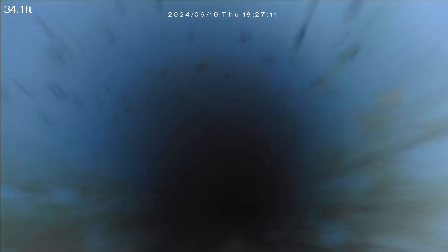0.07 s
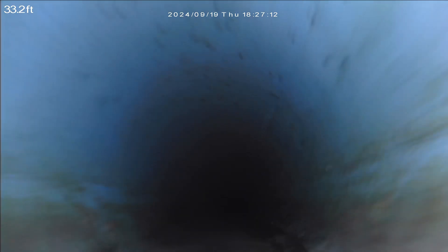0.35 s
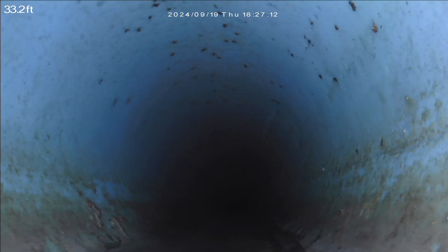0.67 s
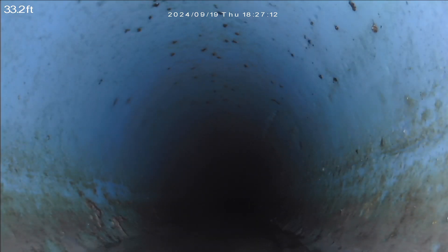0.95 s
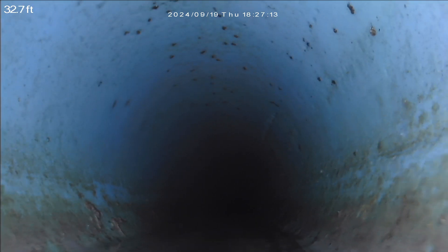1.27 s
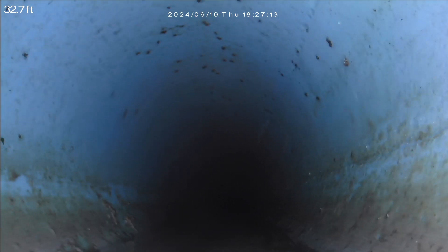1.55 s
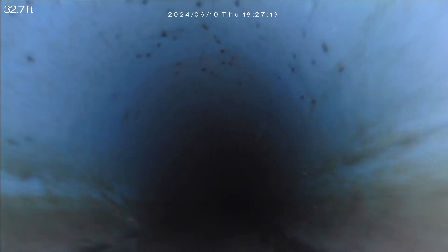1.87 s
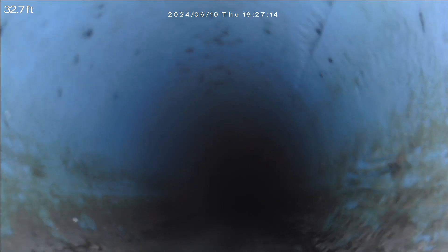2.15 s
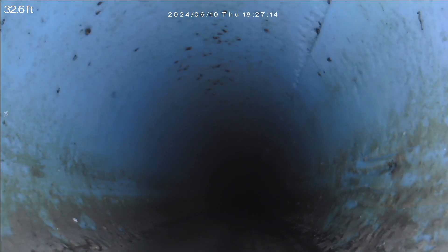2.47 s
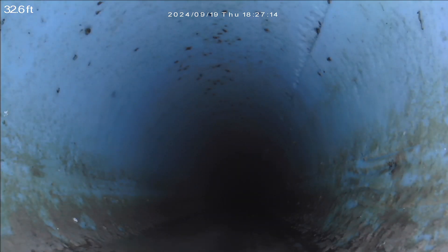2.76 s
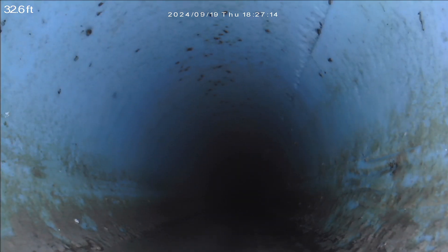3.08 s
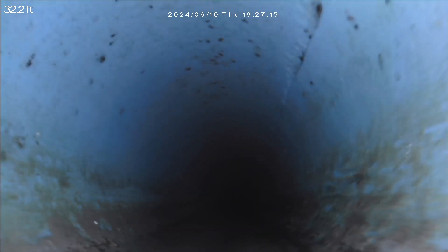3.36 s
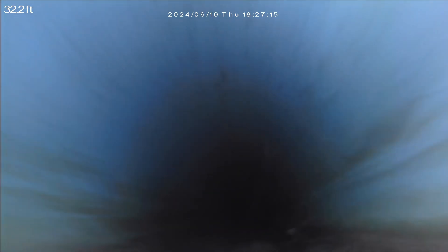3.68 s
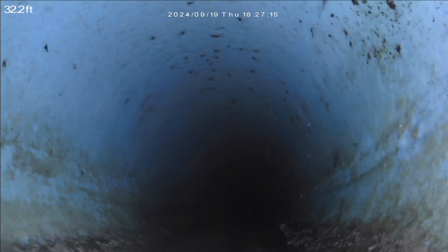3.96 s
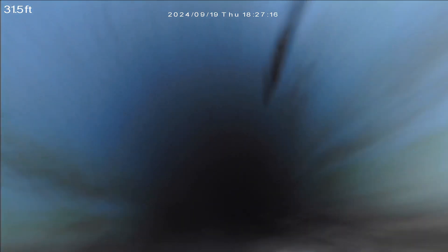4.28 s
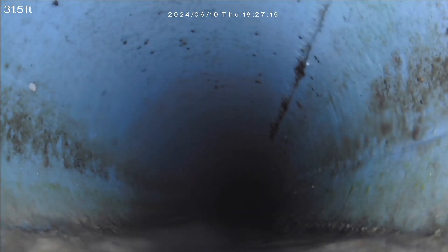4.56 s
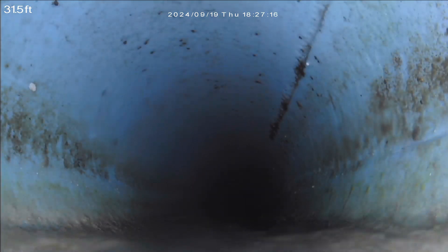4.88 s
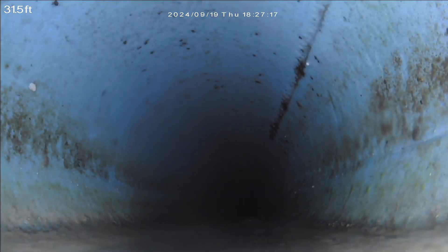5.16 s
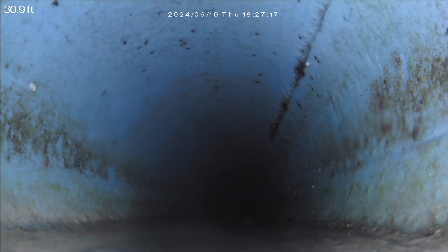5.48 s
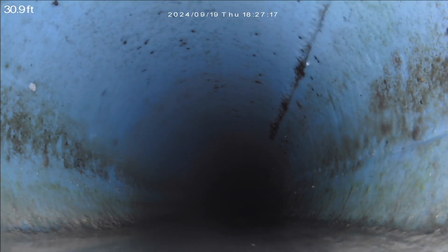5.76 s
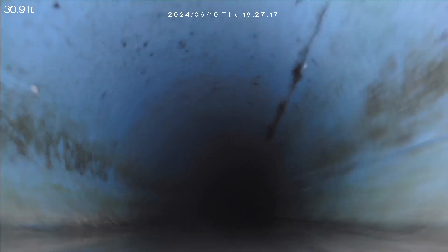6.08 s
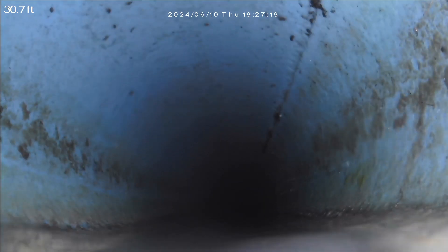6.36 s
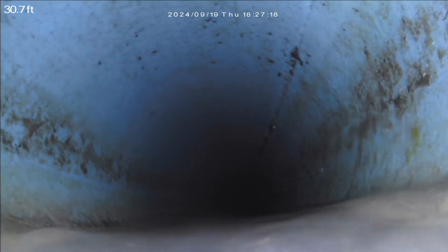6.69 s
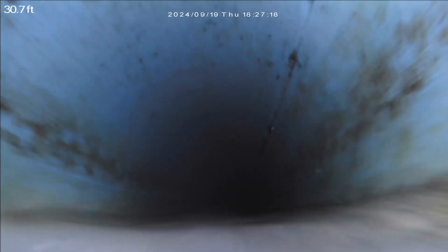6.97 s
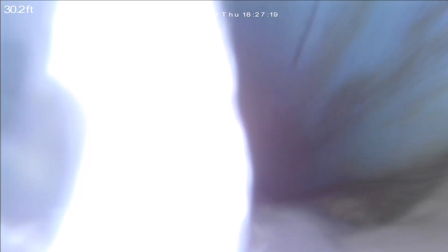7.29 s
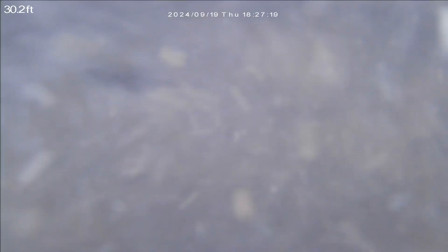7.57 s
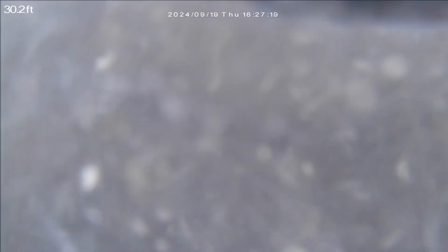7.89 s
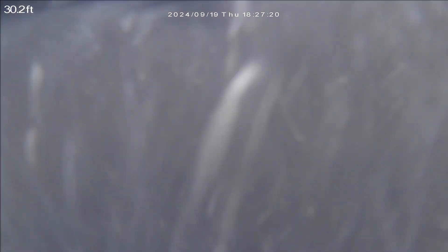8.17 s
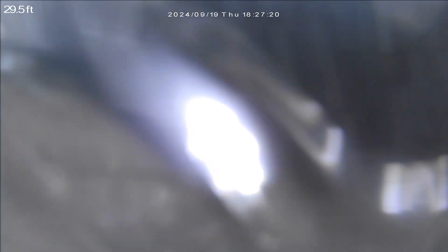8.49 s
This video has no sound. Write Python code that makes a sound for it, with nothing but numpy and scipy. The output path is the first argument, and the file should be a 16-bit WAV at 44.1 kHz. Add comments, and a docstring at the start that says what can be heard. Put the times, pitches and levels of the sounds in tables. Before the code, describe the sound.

A stiff cable is hauled back through a drain pipe in strokes, rumbling and scraping, with knocks on its reel frame and brief squeals.

```python
"""Rumbling scrapes and knocks come in strokes: a drain camera is hauled back, and its stiff push cable
rubs through the guide, strikes the reel frame, twangs and squeals. The microphone sits in the control
box on that frame, so rumble, scraping and blows share the same resonances, and hard pulls overload it.
In the pauses a low hum, hiss and faint rustling remain; near the end the sound cuts out for a moment."""
import sys
import numpy as np
from scipy import signal
from scipy.fft import rfft, irfft
from scipy.io import wavfile
from scipy.ndimage import uniform_filter1d

SR = 44100
rng = np.random.default_rng(int(sys.argv[2]) if len(sys.argv) > 2 else 0)


def store_pcm(level_fs):
    """Save levels as 16-bit WAV."""
    pcm = np.round(np.clip(level_fs, -1, 1) * 32767).astype(np.int16)
    wavfile.write(sys.argv[1], SR, np.atleast_2d(pcm).T)


N = 376602
TIME = np.arange(N) / SR
EVENT_SAMPLES = 16384


def undb(db):
    """Amplitude ratio of a level in decibels."""
    return 10 ** (np.asarray(db) / 20)


def unit(x):
    """Normalise to rms 1."""
    return x / np.sqrt(np.mean(x ** 2))


def crest(x, span_s):
    """Normalise the loudest stretch of span_s to rms 1."""
    return x / np.sqrt(uniform_filter1d(x ** 2, int(span_s * SR)).max())


def steady(x, span_s):
    """Division by the running rms removes slow swells and leaves the fast grain."""
    return x / np.sqrt(uniform_filter1d(x ** 2, int(span_s * SR)) + 1e-12)


def walk(per_s):
    """Slow random modulation of rms 1: held values, smoothed twice."""
    hold = int(SR / per_s)
    held = rng.standard_normal(4096)[np.arange(N) // hold % 4096]
    return unit(uniform_filter1d(uniform_filter1d(held, hold), hold))


def band(x, lo_hz, hi_hz, order=3):
    """Band-pass filter."""
    return signal.sosfilt(signal.butter(order, [lo_hz, hi_hz], "band", fs=SR, output="sos"), x)


def response(points, modes=(), size=8192):
    """Minimum-phase impulse response of a smooth spectrum with resonance peaks on top."""
    hz = np.maximum(np.fft.rfftfreq(size, 1 / SR), 1)
    points_hz, points_db = np.transpose(points)
    db = np.interp(np.log(hz), np.log(points_hz), points_db)
    for centre, width, lift in modes:
        db = db + lift / (1 + (2 * (hz - centre) / width) ** 2)
    cepstrum = irfft(np.log(undb(db)))
    cepstrum[1:size // 2] *= 2  # folding onto positive time makes the response causal
    cepstrum[size // 2 + 1:] = 0
    return irfft(np.exp(rfft(cepstrum)))


def ring(force, impulse):
    """A linear resonator convolves the force with its impulse response."""
    return signal.fftconvolve(force, impulse)[:len(force)]


def add(out, start_s, x):
    """Superpose a sound from start_s on."""
    i = int(start_s * SR)
    out[i:i + len(x)] += x[:N - i]


def slips(per_s, spread_db, smooth):
    """Stick-slip friction: random jerks of uneven size over smooth sliding noise."""
    jerks = (rng.random(N) < per_s / SR) * np.sign(rng.standard_normal(N))
    sizes = undb(spread_db * np.minimum(rng.exponential(size=N), np.pi))
    return unit(jerks * sizes) + smooth * rng.standard_normal(N)


def bend(x, travel_s):
    """Dispersion in a stiff rod: high frequencies arrive first; travel_s is the group delay at 200 Hz."""
    hz = np.fft.rfftfreq(len(x), 1 / SR)
    return irfft(rfft(x) * np.exp(-4j * np.pi * travel_s * np.sqrt(200 * hz)))


def contact(noise, chatter_s, chatter):
    """Impact force: an impulse, then exponentially decaying chatter."""
    force = chatter * noise * np.exp(-np.arange(len(noise)) / SR / chatter_s)
    force[0] += 1
    return force


def background():
    """Broadband air noise coloured by resonances, and a low hum modulated in pitch and level."""
    # Each row: frequency in Hz, spectral density of the air noise in dB.
    air_spectrum = [(25, -34.5), (60, -17), (95, -14), (170, -26), (270, -9), (500, -5), (830, -15),
                    (1020, -22.5), (1500, -29.5), (1900, -29.5), (2250, -31), (3200, -34.5), (4100, -31),
                    (6000, -39), (9000, -39), (13000, -46.5)]
    # Each row: resonance frequency in Hz, width in Hz, lift in dB.
    air_modes = [(261, 18, 6.5), (510, 22, 3.5), (745, 29, 8.5), (858, 79, 5.5), (1160, 93, 6),
                 (1690, 73, 12.5), (1884, 90, 11.5), (1985, 60, 10)]
    air = unit(ring(rng.standard_normal(N), response(air_spectrum, air_modes)))
    air *= undb(-45 + 0.43 * walk(6.4))
    hum_hz = 60 * (1 + .05 * walk(12))
    hum = np.sqrt(2) * np.sin(2 * np.pi * np.cumsum(hum_hz) / SR)
    return air + hum * undb(-54 + 1.8 * walk(4))


def rustle(decay_s=.012, level_db=-66.5):
    """Sparse slips of the slack cable each release a faint, decaying burst of noise."""
    grain = rng.standard_normal(4096) * np.exp(-np.arange(4096) / SR / decay_s)
    scuffs = ring(slips(per_s=20, spread_db=1, smooth=0), grain)
    return unit(band(scuffs, 3000, 8000, order=2)) * undb(level_db)


def swishes():
    """Light sliding friction hisses in soft swells without exciting the frame."""
    # Each row: centre in seconds, half-length in seconds, level in dB.
    swells = [(3.14, .12, -58.5), (3.836, 0.11, -57), (4.41, 0.12, -62), (4.793, 0.1, -56.5),
              (5.162, 0.037, -57.5), (5.306, 0.043, -53.5), (5.575, 0.063, -58), (5.794, 0.03, -58),
              (5.972, 0.045, -62), (6.23, 0.025, -50), (7.68, 0.14, -57)]
    envelope = sum(undb(db) * np.exp(-2 * ((TIME - s) / half_s) ** 2) for s, half_s, db in swells)
    hiss = unit(band(slips(per_s=350, spread_db=4, smooth=.4), 3300, 9500, order=2))
    return hiss * envelope * undb(3.5 * walk(45))


def slide(start_s=8.147, end_s=8.27, level_db=-47):
    """Friction noise: a thin hiss as the cable starts to slide again."""
    # Each row: frequency in Hz, level of the hiss in dB.
    hiss_spectrum = [(2500, -22), (3700, -9), (4250, -4), (4700, -8), (7400, -8), (8000, 0), (8650, -1),
                     (9400, -9), (11500, -28)]
    sliding = uniform_filter1d(1. * ((TIME > start_s) & (TIME < end_s)), size=300)
    return unit(ring(rng.standard_normal(N), response(hiss_spectrum))) * sliding * undb(level_db)


def squeals():
    """Stick-slip friction feeds a single resonance, which swells into a rough tone and dies."""
    # Each row: centre in seconds, half-length in seconds, pitch in Hz, level in dB.
    tones = [(1.25, 0.14, 1880, -32), (1.29, 0.033, 498, -16.5), (2.8, 0.052, 504, -21),
             (3.57, 0.096, 3030, -44), (4.24, 0.037, 2960, -39.5), (6.415, 0.048, 1178, -29),
             (6.855, 0.029, 1180, -33.5), (7.165, 0.042, 2940, -43), (7.225, 0.029, 471, -13.5),
             (7.31, 0.023, 1190, -21.5), (7.42, 0.078, 375, -35), (8.4, 0.031, 489, -9)]
    out = np.zeros(N)
    t = (np.arange(EVENT_SAMPLES) - EVENT_SAMPLES // 2) / SR
    for centre_s, half_s, hz, db in tones:
        tone = band(rng.standard_normal(EVENT_SAMPLES), hz / 1.055, hz * 1.055, order=2)
        envelope = np.exp(-(t / half_s) ** 2)
        add(out, centre_s + t[0], crest(tone * envelope, 0.016) * undb(db))
    return out


def twangs(frame, lead_s=0.00806, echo_s=0.0211, echo_gain=0.56):
    """A flick disperses along the cable into a short falling note, then reflects from the reel."""
    # Each row: time in seconds, level in dB, strongest pitch in Hz.
    flicks = [(2.623, -27, 169), (2.914, -31.5, 177), (3.592, -20, 161), (3.844, -25.5, 179),
              (3.906, -28.5, 200), (4.025, -27.5, 230), (4.103, -25, 250), (4.23, -18.5, 253),
              (4.515, -45, 190), (5.863, -34.5, 272), (6.035, -21.5, 294), (8.261, -10, 267)]
    out = np.zeros(N)
    wave = bend(np.pad(frame, (0, EVENT_SAMPLES - len(frame))), travel_s=.034)
    wave = wave + echo_gain * np.roll(wave, int(echo_s * SR))
    for s, db, hz in flicks:
        note = band(wave, hz / 1.3, hz * 1.4, order=2)
        add(out, s - lead_s, crest(note, 0.062) * undb(db))
    return out


def knocks(frame, rebound_above_db=-9, rebound_s=0.014, rebound_db=-5):
    """Impacts excite free vibration: a falling thud, a clack of the box, a ring of the hoop, a tick."""
    # Each row: start in seconds, strength in dB, hardness in dB (lifts all but the thud),
    # edge in dB (lifts the tick alone).
    blows = [(0.181, -18.5, -11.5, -4), (0.244, -33.5, 1, 12), (0.471, -16, 5, 11), (0.606, -24.5, -6.5, 5),
             (0.648, -18, -14, -5), (0.769, -22, 5, -7), (0.885, -7, 5, 1.5), (0.935, -28.5, 7, -6),
             (1.186, 0, -7.5, 6.5), (1.354, -15, -4, -10), (1.431, -23, -13.5, 2), (1.559, -7, -6.5, 7.5),
             (1.608, -17, -2.5, 5), (1.669, -11, 0.5, 7.5), (1.736, -11, -7.5, 15),
             (1.826, -15, -11.5, 2.5), (1.896, -18, -1, -5.5), (1.974, -15, -12, -2),
             (2.041, -22.5, -4.5, 0.5), (2.125, -23, -3, 9), (2.186, -11.5, -7.5, 4.5),
             (2.31, -15, -11.5, 7), (2.357, -20, 3, -8), (2.471, -33.5, 0, 3), (2.504, -21, -23, 8),
             (2.637, -18.5, -12.5, -12), (2.886, -19.5, -1.5, -8), (3.113, -18.5, -20, 5),
             (3.292, 0, -12, 0), (3.351, -23, 10, -8), (3.596, -14.5, -11, -5), (3.652, -29.5, -1, 10),
             (3.824, -29, -5, -5), (4.157, -14.5, -15, -3), (4.304, -33.5, 1.5, 9), (4.518, -27.5, -11, -5),
             (4.662, -34.5, -4, -7), (5.867, -30, -14.5, -3), (6.024, -27, 0, -12), (6.227, -36, 0.5, 8),
             (6.357, -13.5, -7.5, 0.5), (6.401, -11.5, -9.5, -5), (6.711, -16.5, -5, -9),
             (6.788, -27.5, -3, -8), (6.906, -14.5, -5, -23), (7.033, -16.5, -11.5, -3),
             (7.267, -19, -26, -9), (7.303, -9, -14, -7), (7.347, -12.5, -13.5, -3), (7.406, -7.5, -23, -5),
             (7.497, -34, -6, 5), (8.147, -28, -27, 0), (8.244, -10, -6, 0), (8.268, -10.5, -2.5, 0.5),
             (8.3, -12.5, -13, 4)]
    # Each row: frequency in Hz, broad response of the steel hoop in dB.
    hoop_spectrum = [(1800, -18.5), (2600, -6.5), (3400, 3.5), (5400, -8.5), (6500, -18.5), (9000, -28),
                     (16000, -30.5)]
    # Each row: resonance frequency of the hoop in Hz, width in Hz, lift in dB.
    hoop_modes = [(2360, 98, 17.5), (3020, 260, 18), (4500, 560, 11), (5244, 320, 16.5), (5890, 410, 5.5)]
    # Each row: frequency in Hz, level of a hard contact in dB.
    tick_spectrum = [(2500, -7), (4400, 4.5), (5400, 4), (6500, -3.5), (8000, 1.5), (9500, -3),
                     (11500, -14.5), (16000, -19.5)]
    hoop, hard_contact = response(hoop_spectrum, hoop_modes), response(tick_spectrum)
    out = np.zeros(N)
    for start_s, db, hardness_db, edge_db in blows:
        noise = rng.standard_normal(EVENT_SAMPLES)
        jolt = ring(contact(noise, chatter_s=0.0056, chatter=0.069), frame)
        thud = bend(band(jolt, 255, 1095, order=2), travel_s=0.00627)
        clack = band(ring(contact(noise, chatter_s=.007, chatter=.3), frame), 700, 2500)
        ping = ring(contact(noise, chatter_s=0.005, chatter=0.3), hoop)
        tick = ring(contact(noise, chatter_s=0.0098, chatter=.4), hard_contact)
        clack_db = db + hardness_db
        ping_db = clack_db - 13 + 0.41 * hardness_db  # soft blows hardly ring the hoop
        tick_db = clack_db - 20 + edge_db
        parts = (thud, db), (clack, clack_db), (ping, ping_db), (tick, tick_db)
        blow = sum(crest(part, 0.035) * undb(part_db) for part, part_db in parts)
        add(out, start_s, blow)
        if db > rebound_above_db:  # the heaviest blows bounce once
            add(out, start_s + rebound_s, blow * undb(rebound_db))
    return out


def tug(start_s, length_s, attack_s=0.04, release_db_per_s=207.5):
    """Envelope of a tug: a linear rise, and exponential decay once length_s has passed."""
    t = TIME - start_s
    return np.clip(t / attack_s, 0, 1) * undb(-release_db_per_s * np.clip(t - length_s, 0, 1))


def shares(rub_db, rumble_db, grit_db, bright_db, sway_db):
    """Gains of sway, rumble, low rub, high rub and grit; brightness divides the power of the rub."""
    low = 1 / np.hypot(1, undb(bright_db))
    ratios = undb(rumble_db + sway_db), undb(rumble_db), low, low * undb(bright_db), undb(grit_db)
    return np.array([undb(rub_db) * ratio for ratio in ratios])


def effort():
    """The five friction gains over time: drag and tugs add in power, as incoherent sources do."""
    # Each row: time in seconds, rub in dB, rumble and grit in dB relative to the rub,
    # sway in dB relative to the rumble.
    drag_levels = [(0, -31, 1, -11.5, -7), (0.6, -22.5, 3.5, -18, 2), (1.5, -27, 9.5, -16, -3.5),
                   (2.0, -26.5, 4.5, -14, 5.5), (2.801, -27, 1.5, -19.5, 1), (3.2, -35, 7, -15, 3.5),
                   (3.48, -22.5, -4, -12, -24), (4.0, -36.5, 2.5, -13, 2.5), (4.36, -29.5, -10.5, -16, 4.5),
                   (4.85, -53.5, 3, -19, 4), (5.78, -57.5, 0.5, -3.5, 7), (5.92, -37, -1.5, -24, -6),
                   (6.14, -36, 5, -8.5, -0.5), (6.65, -32.5, -0.5, -16.5, 12), (6.95, -27, 0, -11.5, -11),
                   (7.52, -31, 5, -21, 4.5), (7.9, -52, 13.5, -11, -1), (8.34, -18.5, -3, -29, 0)]
    # Each row: start in seconds, length in seconds, rub in dB, rumble and grit in dB relative
    # to the rub, brightness in dB (high rub over low rub).
    tugs = [(0.058, 0.036, -24.5, 7.5, -31, -2), (0.186, 0.15, -15, 6, -17.5, -4),
            (0.284, 0.19, -2.5, 3.5, -11, -0.5), (0.527, 0.07, -17, 7.5, -36, -18),
            (0.713, 0.061, -21.5, 10.5, -16, 4), (0.862, 0.18, -13.5, 1, -15, 1.5),
            (0.977, .11, -10.5, -2.5, -13.5, -7), (1.166, 0.055, -8, 2.5, -12, 1),
            (1.362, 0.081, -18, -12, -38, -5), (1.629, 0.12, -3.5, 1, -15, -4),
            (1.773, 0.16, -16.5, 5.5, -21.5, -10), (2.1, 0.1, -8, 3, -20.5, -7.5),
            (2.278, 0.032, -14.5, 2.5, -18.5, 1), (2.49, 0.042, -21, 9.5, -41, -28),
            (2.626, 0.03, -19, 9, -23, -7), (2.895, 0.033, -21, 6.5, -15, -5),
            (3.086, 0.036, -18, -10, -21.5, -3), (3.253, 0.12, -15, -2.5, -22, 0.5),
            (3.544, 0.096, -19, 2, -12, -6), (3.838, 0.034, -22.5, -1, -34, -2.5),
            (4.007, 0.09, -27.5, 1, -24, 5), (4.129, 0.16, -20, -10, -13.5, 1.5),
            (4.506, 0.066, -30, -0.5, -33, -10), (4.637, 0.035, -35, -1, -5, 1),
            (6.015, 0.056, -19, -19, -18, -6.5), (6.334, .035, -17, 1, -11.5, 8),
            (6.386, 0.037, -19, -4, -22, -6), (6.544, 0.036, -28.5, 8.5, -11, -9),
            (6.818, 0.042, -19.5, -10, -31, 6), (7.057, 0.15, -21.5, -27, -20, 1),
            (7.258, 0.098, -9, -4.5, -27, -1.5), (7.336, .12, -10.5, -1.5, -24.5, -4),
            (8.243, 0.034, -6.5, -8.5, -14, 2), (8.366, 0.2, -11.5, -2, -20.5, -0.5)]
    times, *columns = np.transpose(drag_levels)
    rub_db, rumble_db, grit_db, sway_db = (np.interp(TIME, times, column) for column in columns)
    drag = shares(rub_db, rumble_db, grit_db, bright_db=-4.5, sway_db=sway_db)
    judder = undb(2.5 * walk(20))  # the drag is never quite even
    tug_gains = np.array([shares(*row[2:], sway_db=-2.5) for row in tugs])
    envelopes = np.array([tug(*row[:2]) for row in tugs])
    return np.sqrt((drag * judder) ** 2 + tug_gains.T ** 2 @ envelopes ** 2)


def hauling(frame, full_grit_db=-12.5):
    """Friction forces the frame to vibrate: the reel rumbles, the cable rubs and grit scrapes."""
    shaking = ring(slips(per_s=300, spread_db=3, smooth=0.48), frame)
    sway = steady(band(shaking, 25, 84.4), span_s=0.13) * undb(-3.0)  # the whole reel moves
    rumble = steady(band(shaking, 82.0, 165.0), span_s=0.076) * undb(-0.5)
    rubbing = ring(slips(per_s=300, spread_db=1.0, smooth=0.51), frame)
    low_rub = steady(band(rubbing, 184.5, 418.5), span_s=0.054)
    high_rub = steady(band(rubbing, 429, 1110), span_s=0.057)  # favoured by quicker sliding
    grinding = ring(slips(per_s=2200, spread_db=2.0, smooth=0.58), frame)
    scrape = unit(band(grinding, 900, 14000)) * undb(1.8 * walk(60))
    cracking = ring(slips(per_s=220, spread_db=2, smooth=0), frame)
    crunch = unit(band(cracking, 1500, 15000)) * undb(-5.5)
    gains = effort()
    load = (gains[-1] / undb(full_grit_db)) ** .3  # coarse grains crack more softly in a lighter pull
    grit = scrape + load * crunch
    return sum(gain * part for gain, part in zip(gains, (sway, rumble, low_rub, high_rub, grit)))


def scene():
    """Structure-borne sound: hauling, knocks and twangs share the frame's modes; the rest adds on."""
    # Each row: frequency in Hz, broad response of the frame in dB.
    frame_spectrum = [(22, -17), (50, -4.5), (160, -2.5), (300, -1), (560, -5.5), (800, -15), (1050, -24.5),
                      (2300, -28.5), (3500, -38.5), (5600, -32), (6600, -42.5), (9200, -42.5), (12000, -56),
                      (16000, -47.5)]
    # Each row: resonance frequency of reel frame and box in Hz, width in Hz, lift in dB.
    frame_modes = [(63.4, 8.7, 9.5), (118.9, 39, 10.5), (141.7, 16, 5), (209.9, 18.4, 12), (252.8, 33, 11),
                   (380.1, 17.6, 8.5), (433.6, 10, 2.5), (484.3, 34.6, 14.5), (537.5, 54, 11), (647, 18, 8),
                   (757, 49, 8), (885, 70, 8), (1165.4, 72, 11.5), (1238, 130, 10.5), (1397, 180, 4.5),
                   (1624, 80, 11.5), (1845, 162, 13.5), (2009, 46, 9), (2300, 100, 9), (2650, 88, 2.5),
                   (2904, 170, 9.5), (3380, 48, 9.5), (3670, 510, 10), (4520, 210, 6.5), (4960, 200, -4.5)]
    frame = response(frame_spectrum, frame_modes)
    vibration = hauling(frame) + knocks(frame) + twangs(frame)
    return (vibration + squeals() + swishes() + slide() + rustle() + background())[None]


def record(dry, ceiling=.7, mute_start_s=8.024, mute_end_s=8.141, top_hz=15700):
    """Overload clips the input stage hard; the sound drops out briefly and a low-pass cuts the top."""
    oversampled = signal.resample_poly(dry, 2, 1, axis=-1)
    clipped = signal.resample_poly(np.clip(oversampled, -ceiling, ceiling), 1, 2, axis=-1)
    live = uniform_filter1d(1. * ((TIME < mute_start_s) | (TIME > mute_end_s)), size=128)
    return signal.sosfilt(signal.ellip(10, .1, 80, top_hz, fs=SR, output="sos"), clipped * live)


dry = scene()
out = record(dry)
store_pcm(out)
```